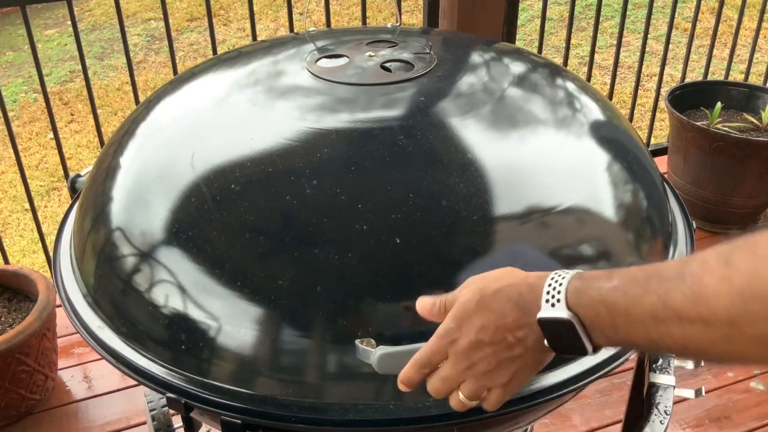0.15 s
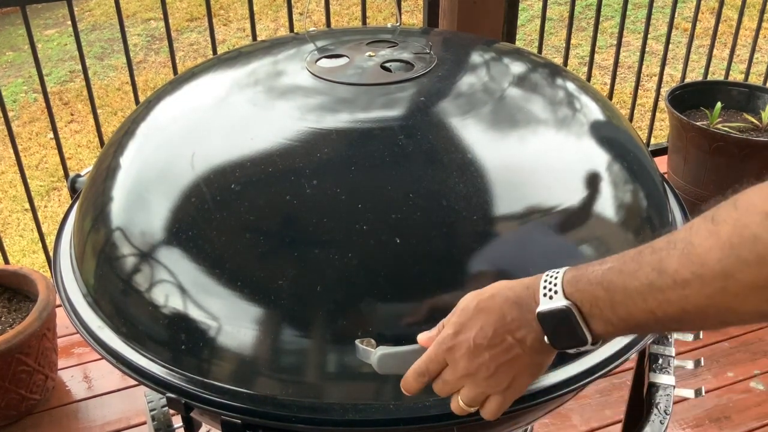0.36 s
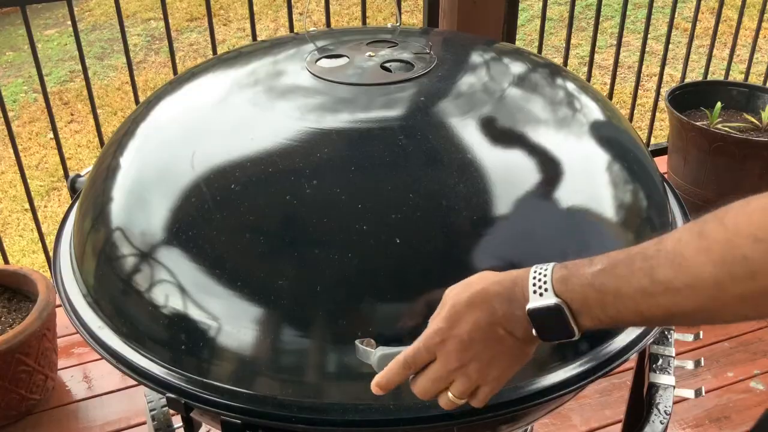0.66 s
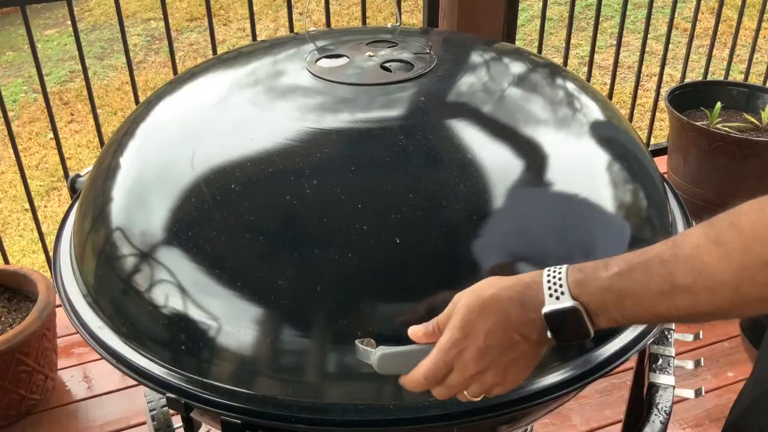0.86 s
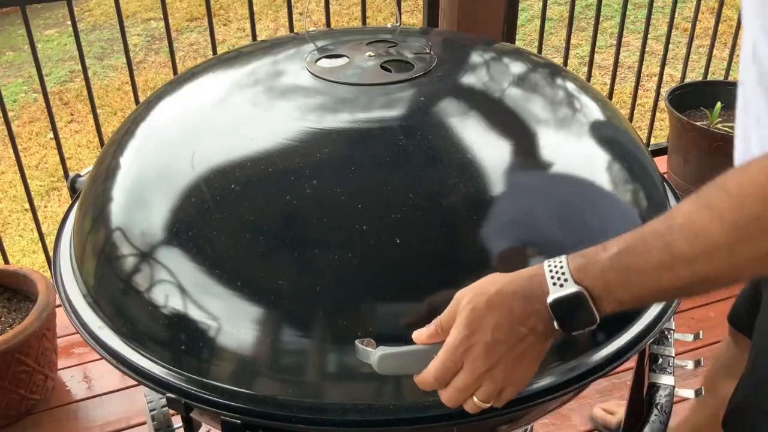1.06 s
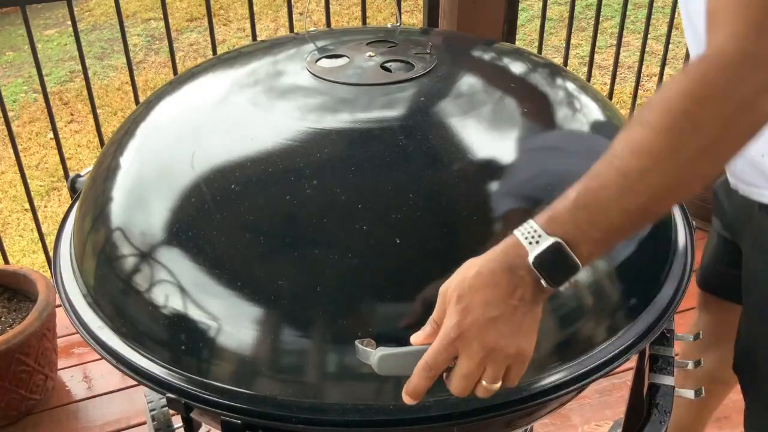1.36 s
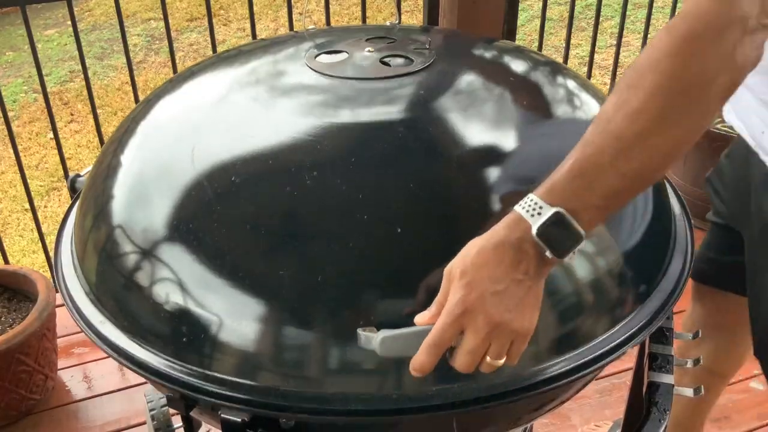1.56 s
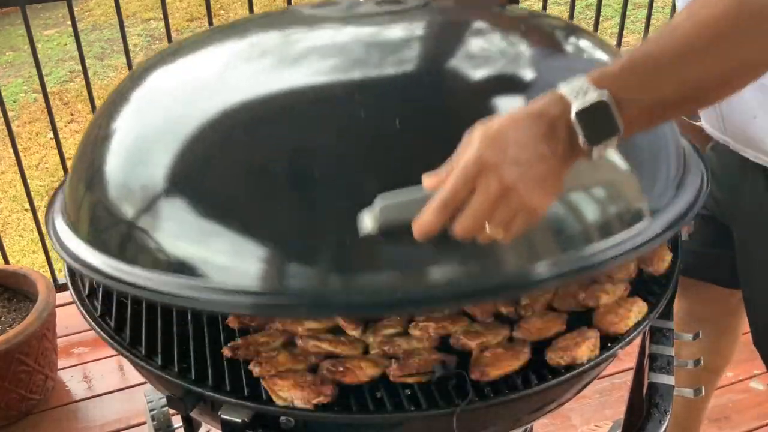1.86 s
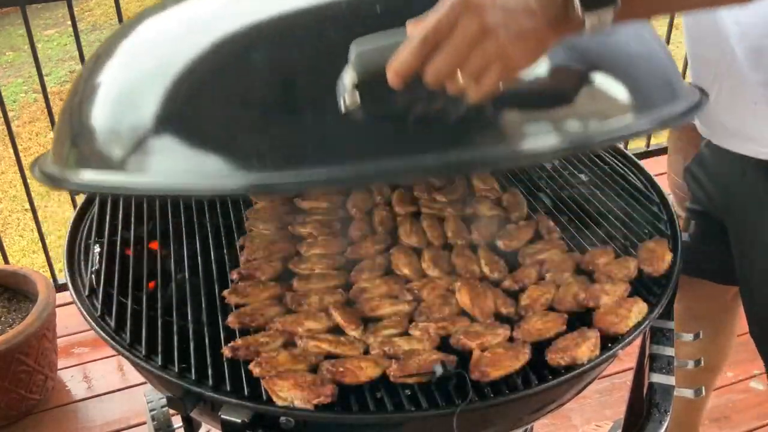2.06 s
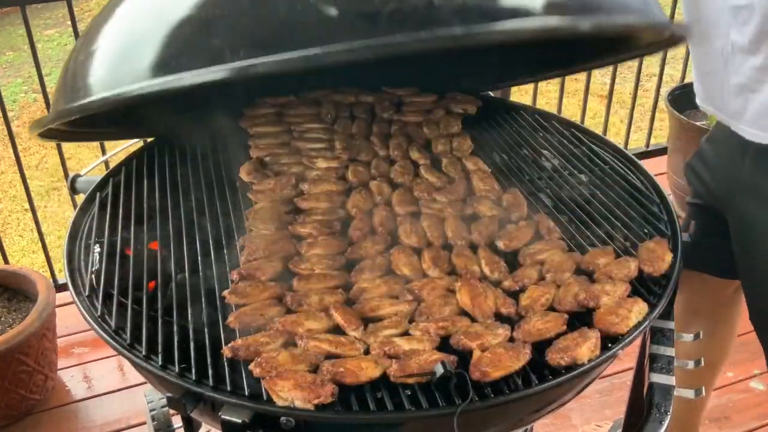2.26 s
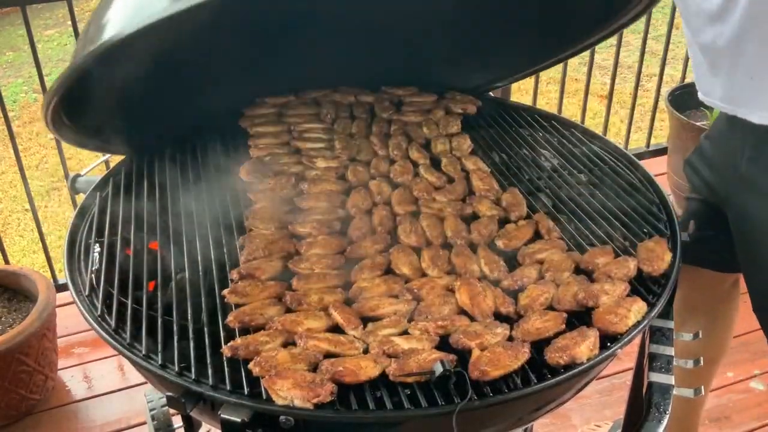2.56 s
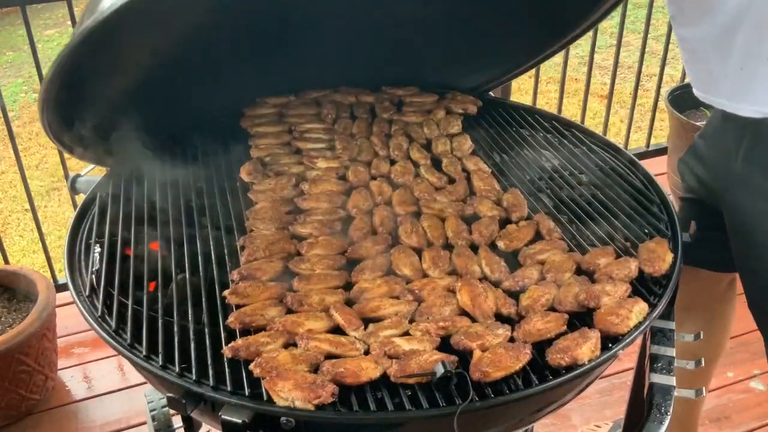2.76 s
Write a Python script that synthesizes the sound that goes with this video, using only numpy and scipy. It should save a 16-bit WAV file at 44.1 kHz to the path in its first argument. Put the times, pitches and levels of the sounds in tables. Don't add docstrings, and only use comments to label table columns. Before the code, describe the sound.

Metal grill lid being opened outdoors, heard close in stereo: quiet handling first, small bright ticks, a light ringing tap, then a very loud overloading clank, a second clank, rattly chinks and a short beating ring over rain hiss and low rumble.

```python
import sys
import numpy as np
from scipy import signal
from scipy.fft import rfft, irfft, next_fast_len
from scipy.io import wavfile
from scipy.ndimage import uniform_filter1d

SR = 44100
rng = np.random.default_rng(int(sys.argv[2]) if len(sys.argv) > 2 else 0)


def persist_wave(psi):
    counts = np.round(np.clip(psi, -1, 1) * 32767).astype(np.int16)
    wavfile.write(sys.argv[1], SR, np.atleast_2d(counts).T)


def ratio(d):
    e = np.asarray(d, float) / 20
    return 10 ** e


N = 127890

# frequency in Hz, density in dB per Hz.
YARD_SPECTRUM = [(12, -18), (20, 10), (130, -2), (270, -19), (310, -10.5), (377, -16), (499, -18),
                 (949, -20.5), (16000, -36.5)]
# time in seconds, level in dB.
RAIN_SWELL = [(0, -6), (.1, -1), (0.451, -0.5), (0.75, 8.5), (.97, -1), (1.28, 4.5), (1.58, 5.5),
              (1.75, 1.5), (1.97, 2.5), (2.1, 7.5), (2.9, 15.5)]
# frequency in Hz, width in Hz, level in dB.
DRONE_LINES = [(79, 22, -51), (129.5, 15, -48), (311, 14, -57)]
# start in seconds, length in seconds, level in dB,
# place of the peak from 0 to 1, brightness in dB per octave.
RUBS = [(0.062, 0.4, -37, 0.02, 3.5), (0.132, 0.24, -38.5, 0.03, 1.5), (0.354, 0.015, -31.5, 0.55, 14),
        (0.555, 0.18, -30, 0.05, 5.5), (0.625, 0.098, -30.5, 0.67, 2), (0.77, 0.23, -41, 0.14, 6),
        (1.006, 0.071, -38.5, 0, 5.5), (1.079, 0.16, -38.5, 0.13, 6.5), (1.159, 0.12, -34, 0.1, 18),
        (1.27, 0.06, -39, 0.8, 3), (1.319, 0.07, -21.5, 0, 2.5), (1.356, .15, -19, 0.53, 2),
        (1.631, 0.12, -29, 0, 5), (1.71, 0.055, -30.5, 0.08, 7.5), (1.811, 0.012, -38.5, 0, 3),
        (1.961, 0.032, -40.5, 0.6, 8.5), (2.198, 0.043, -21.5, 0, 6), (2.208, 0.083, -19.5, 0.07, 1.5),
        (2.252, 0.91, -29, 0.35, 5.5), (2.5, 0.21, -44, 0.3, 29), (0.209, 0.016, -33.5, 0.2, 1),
        (2.482, 0.049, -23.5, 0.6, 14), (2.582, 0.068, -23, 0, 5.5), (2.604, 0.41, -25.5, 0.29, 6.5)]
# frequency in Hz, density in dB per Hz.
RUB_SPECTRUM = [(180, -6.5), (300, -4), (961, -1.5), (1250, -0.5), (1460, 2), (4090, -1.5), (4830, -0.5),
                (7950, -9), (16000, -8.5)]
# start in seconds, dense ring in dB, bright snap in dB,
# ring T60 in seconds, contact in seconds.
BLOWS = [
    (0.561, -32.5, -83, 0.24, 0.017),
    (1.3186, -62, -21, 0.056, 0.0018),
    (1.613, -32, -15, 0.58, 0.015),
    (1.619, -28, -18, 0.3, 0.021),
    (2.217, -21, -14, 0.45, 0.0045),
    (2.233, -5, -11.5, 0.39, 0.0023),
    (2.452, -7, -23, 0.31, 0.0022),
    (2.512, -13.5, -46, 0.41, 0.012),
    (2.64, -14, -48, 0.81, 0.41),
]
# frequency in Hz, density in dB per Hz.
DOME_SPECTRUM = [(200, -7), (560, -17), (850, -7.5), (1200, -12.5), (1600, -13.5), (2200, -9.5),
                 (2900, -14), (3800, -24), (9000, -40)]
# frequency in Hz, density in dB per Hz.
SNAP_SPECTRUM = [(1760, -22), (3000, -19), (3600, -26.5), (7250, -22.5), (8820, -34), (10700, -7),
                 (16000, -13)]
# mode in Hz, level in dB, T60 in seconds.
KNOCK_MODES = [(750, -4, 0.25), (810, 0, 0.24), (980, 2, 0.18), (510, -1, 0.092)]
# start in seconds, level in dB, rise in seconds.
KNOCKS = [(.578, -49, .01), (.795, -44, 0.0087), (1.01, -47, 0.0063), (1.415, -28.5, 0.025),
          (2.535, -13.5, 0.019)]
# mode in Hz, level in dB, T60 in seconds.
TICK_MODES = [(120, -26.5, 0.13), (310, -40, 0.81), (690, -53, 0.24), (834, -29.5, 0.57), (866, -35, 0.65),
              (1001, -38, 0.39), (1669, -37, 0.67), (2260, -29, 0.32), (2510, -34, 0.49), (2664, -36, 0.4),
              (2760, -51, 0.21), (2840, -41, 0.82)]
FIRST_MODES = [(61, -37, 0.22), (144.5, -5.5, 0.31), (176.4, -14.5, 0.39), (226, -1.5, 0.072),
               (300, 0.5, 0.21), (466, -17, 0.082), (820, -14.5, 0.36), (898, -19.5, 0.66),
               (1556, -17, 0.26), (1610, -30, 0.27), (1860, -16, 0.69), (2180, -5.5, 0.26),
               (2515, -15, 0.22), (2820, -19, 0.22)]
SECOND_MODES = [(124.3, -12.5, 0.35), (314, -8.5, 0.16), (454, -11, 0.2), (651, -19, 0.95), (692, -24, 0.2),
                (777, -20, 0.65), (804.7, -12, 0.51), (870, -3, 0.23), (904, -14, 0.43), (996, -19.5, 0.36),
                (1078, -14.5, 0.34), (2625, -26, 0.25), (2847, -22.5, 0.13)]
THUD_MODES = [(60, -22, 0.3), (139.6, -12, 0.36), (164.7, -18, 0.4), (309.3, -12, 0.3), (431, -25, 0.48),
              (776, -10, 0.32)]
LAST_MODES = [(53, -29, 0.3), (135.5, -14, 0.39), (178, -14.5, 0.24), (293, -24.5, 0.57),
              (341, -20.5, 0.36), (468, -24, 0.48)]
CLANK_STARTS = [1.628, 2.233, 2.452, 2.503, 2.692]
CLANK_RISES = [0.0051, 0.0015, 0.0041, 0.0083, 0.0099]
# start in seconds,
# level in dB, T60 in seconds, brightness in dB per octave.
RIM_TICKS = [(1.3187, -11, .012, -3), (1.3232, -26, .05, -4), (1.3507, -26, .018, -3)]
CHINKS = [(2.4875, -9.5, 0.14, 5), (2.5784, -9.5, 0.11, 14)]
# frequency in Hz, density in dB per Hz.
CHINK_SPECTRUM = [(1200, -50), (4700, 4.5), (5700, -7), (6800, -5), (8600, -2), (9700, -17), (13400, -4),
                  (16000, -9)]
# frequency in Hz, level in dB, width in Hz.
ROCKING_LINES = [(716, -2.5, 140), (787.6, 4.5, 16), (844, 3, 23), (905, -13, 7.3), (934, -5, 10)]
# time in seconds, level in dB.
ROCKING_SWELL = [(2.6, -48), (2.65, -28.5), (2.69, -17.5), (2.724, -12.5), (2.746, -10), (2.77, -19.5),
                 (2.81, -18), (2.84, -26.5), (2.9, -20.5)]
# frequency in Hz, phase in radians.
PORT_PHASE = [(0, 0), (20, -.15), (900, -.3), (1460, -5.3), (10150, -15 * np.pi), (15270, -23 * np.pi),
              (22050, -33.6 * np.pi)]
# frequency in Hz, coherence from 0 to 1.
PORT_COHERENCE = [(60, .96), (400, .93), (900, .78), (1500, .35), (6000, .25), (9700, .4), (10050, .985),
                  (16000, .985)]


def evened(x):
    return x / np.sqrt(np.mean(x ** 2) + 1e-20)


def read(points, hz):
    f, value = np.transpose(points)
    return np.interp(np.log(hz + 1), np.log(f + 1), value)


def add(mix, s, sound):
    part = mix[round(s * SR):][:len(sound)]
    part += sound[:len(part)]


def coloured(x, spectrum, tilt_db=0.):
    hz = np.fft.rfftfreq(len(x), 1 / SR)
    gain_db = read(spectrum, hz) + tilt_db * np.log2((hz + 100) / 4000)
    return evened(irfft(rfft(x) * ratio(gain_db), len(x)))


def resonate(x, hz, width):
    turn = np.exp(2j * np.pi * hz * np.arange(len(x)) / SR)
    r = np.exp(-np.pi * width / SR)
    return evened((turn * signal.lfilter([1 - r], [1, -r], x / turn)).real)


def yard():
    frames, hz = N // 256 + 5, np.fft.rfftfreq(1024, 1 / SR)
    a, b, patches = rng.standard_normal((frames, 513, 3)).T
    patches = evened(uniform_filter1d(uniform_filter1d(patches, 20, 0), 12, 1))
    swell = evened(uniform_filter1d(rng.standard_normal(frames), 8))
    rain_db = np.interp(np.arange(frames) * 256 / SR, *np.transpose(RAIN_SWELL))
    level_db = read(YARD_SPECTRUM, hz)[:, None] + 0.45 * patches + 1.9 * swell
    level_db = level_db + np.outer(hz / (hz + 300), rain_db)
    z = (a + 1j * b) * ratio(level_db)
    drone = sum(ratio(db) * resonate(rng.standard_normal(N), f, w) for f, w, db in DRONE_LINES)
    return ratio(-39.5) * evened(signal.istft(z, nperseg=1024, noverlap=768)[1][:N]) + drone


def rub(start, length, level_db, place, tilt_db):
    grit_db, grit_per_s, grit_share = 3, 2900, 0.43
    n = SR // 2
    noise, draw, size = rng.standard_normal(n), rng.random(n), rng.exponential(1, n)
    grit = np.sign(noise) * (draw < grit_per_s / SR) * ratio(grit_db * np.minimum(size, 5))
    rough = (1 - grit_share) * noise + grit_share * evened(grit)
    u, place = np.arange(n) / SR / length, np.clip(place, .01, .95)
    swell = np.sin(np.pi / 2 * np.minimum(u / place, 1)) ** 2
    fade = ratio(-18 * np.maximum((u - place) / (1 - place), 0) ** 1.3)
    shape = np.where(u < place, swell, fade)
    return start, ratio(level_db) * shape * coloured(rough, RUB_SPECTRUM, tilt_db)


def dome():
    hz = np.linspace(250, 9000, num=700) + rng.uniform(-7.5, 6.74, 700)
    t = np.arange(SR // 3) / SR
    size = ratio(read(DOME_SPECTRUM, hz) + 3.8 * rng.standard_normal(700))
    waves = np.sin(2 * np.pi * (hz[:, None] * t + rng.random((700, 1))))
    return size @ (waves * ratio(-14 * np.outer(hz / 3000, t)))


def blow(sheet, start, ring_db, snap_db, t60, contact):
    settle = 1500
    noise, t = rng.standard_normal((3, len(sheet))), np.arange(len(sheet) - settle) / SR
    ring = signal.fftconvolve(noise[0, :settle], sheet)[settle:len(sheet)]
    wash = coloured(noise[2, settle:], DOME_SPECTRUM)
    ring = ring / np.std(ring[:2000]) + 0.8 * wash
    ring = ring * (1 - np.exp(-t / (0.3 * contact))) * ratio(ring_db - 60 * t / t60)
    ring = ring * np.minimum((t[-1] - t) / 0.027, 1)
    fade = np.exp(-(t / contact) ** 2) + ratio(-15 - 60 * t / 0.23)
    snap = np.minimum(t / 0.00039, 1) * fade * coloured(noise[1, settle:], SNAP_SPECTRUM)
    return start, ring + ratio(snap_db) * snap


def clank(modes, rise):
    wobble, wobble_s = 0.3, 0.02
    t, span = np.arange(SR // 2) / SR, round(wobble_s * SR)
    sway = rng.standard_normal((len(modes), 2, len(t)))
    sway = uniform_filter1d(uniform_filter1d(sway, span), span)
    sway = sway / sway.std()
    total = np.zeros(len(t))
    for k, ((hz, db, t60), (a, b)) in enumerate(zip(modes, sway)):
        angle = 2 * np.pi * hz * t
        wave = (1 + wobble * a) * np.sin(angle) + wobble * b * np.cos(angle)
        total += (-1) ** k * ratio(db - 60 * t / t60) * wave
    return (1 - np.exp(-t / rise)) * total


def chink(start, level_db, t60, tilt_db):
    t = np.arange(SR // 5) / SR
    envelope = ratio(level_db - 60 * t / t60) * np.minimum(t / 0.00015, 1)
    return start, envelope * coloured(rng.standard_normal(len(t)), CHINK_SPECTRUM, tilt_db)


def rocking():
    beat_s, blur = 2.7245, 0.4
    s, level_db = np.transpose(ROCKING_SWELL)
    t = np.arange(s[0], N / SR, 1 / SR)
    lines = np.zeros(len(t))
    for f, db, width in ROCKING_LINES:
        unsteady = resonate(rng.standard_normal(len(t)), f, width)
        lines += ratio(db) * (np.sin(2 * np.pi * f * (t - beat_s)) + blur * unsteady)
    return s[0], evened(lines) * ratio(np.interp(t, s, level_db)) * np.minimum((t - s[0]) / 0.022, 1)


def scene():
    mix, sheet = yard(), dome()
    for row in RUBS:
        add(mix, *rub(*row))
    for row in BLOWS:
        add(mix, *blow(sheet, *row))
    clanks = [TICK_MODES, FIRST_MODES, SECOND_MODES, THUD_MODES, LAST_MODES]
    for s, modes, rise in zip(CLANK_STARTS, clanks, CLANK_RISES):
        add(mix, s, clank(modes, rise))
    for s, level_db, rise in KNOCKS:
        add(mix, s, ratio(level_db) * clank(KNOCK_MODES, rise))
    add(mix, *rocking())
    for row in CHINKS + RIM_TICKS:
        add(mix, *chink(*row))
    return np.array([mix, mix])


def top_cut(x):
    return signal.sosfilt(signal.butter(12, 16410, fs=SR, output="sos"), x)


def record(dry):
    clip, edge_hz = 1.03, 15760
    bins, _, z = signal.stft(dry, SR, nperseg=256, noverlap=192)
    wander = uniform_filter1d(rng.standard_normal(z.shape), size=24, axis=2)
    wander = evened(uniform_filter1d(wander, size=9, axis=1))
    spread = np.sqrt(-np.log(read(PORT_COHERENCE, bins)))[:, None]
    turned = signal.istft(z * np.exp(1j * wander * spread), nperseg=256, noverlap=192)[1][:, :N]
    size = next_fast_len(N + 4096)
    hz = np.fft.rfftfreq(size, 1 / SR)
    lag = np.exp(1j * np.outer([1, 0], np.interp(hz, *np.transpose(PORT_PHASE))))
    band = 0.015 + 0.94 / (1 + (hz / edge_hz) ** 200)
    ports = irfft(lag * rfft(turned, size) * band, size)[:, :N]
    return top_cut(np.clip(ports, -clip, clip))


dry = scene()
out = record(dry)
persist_wave(out)
```